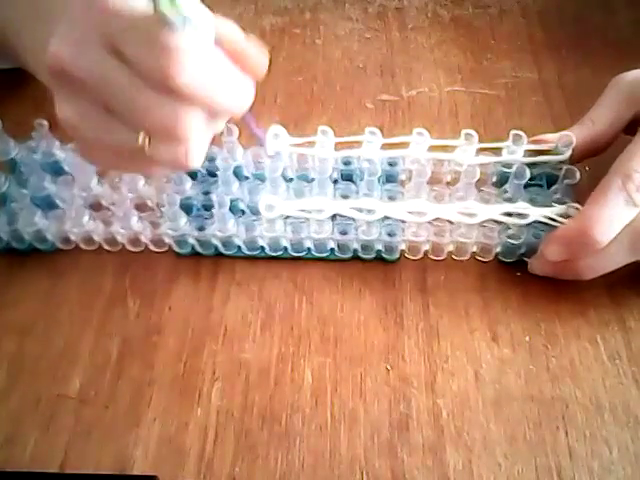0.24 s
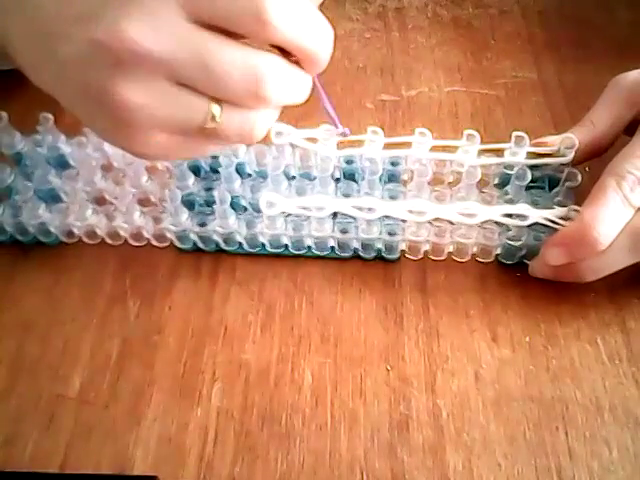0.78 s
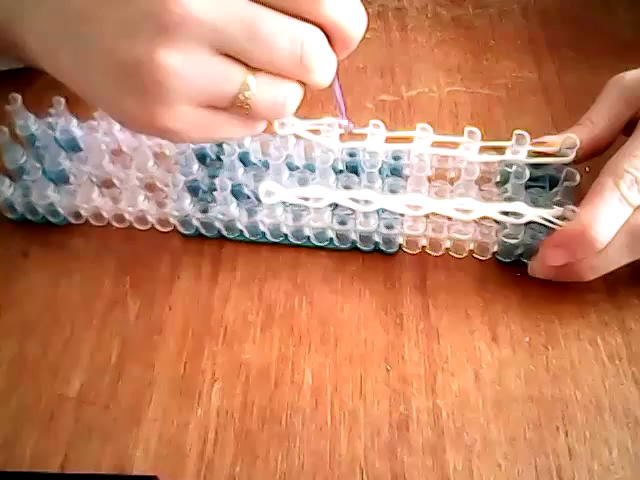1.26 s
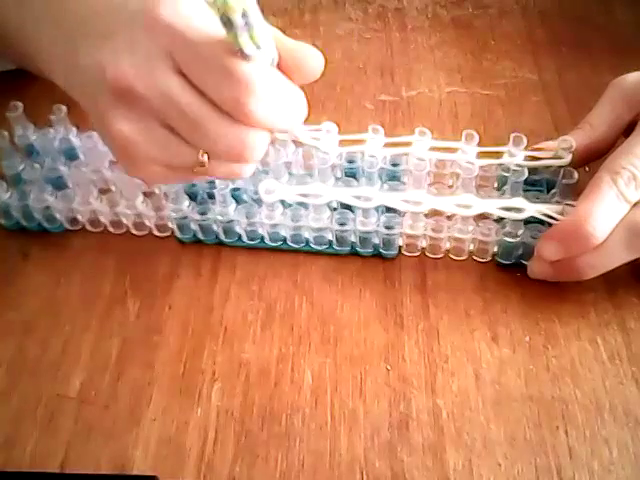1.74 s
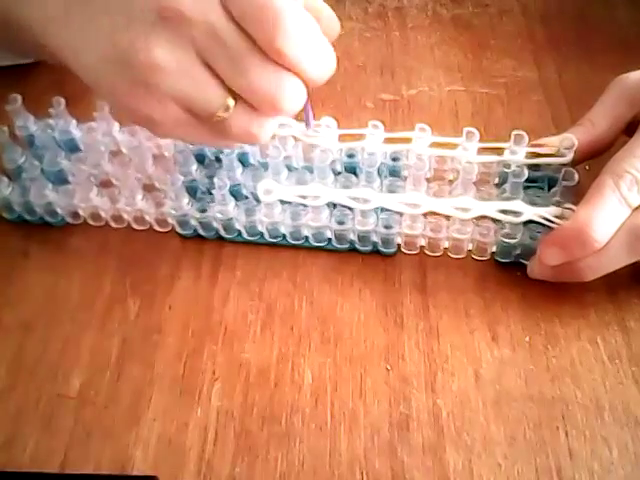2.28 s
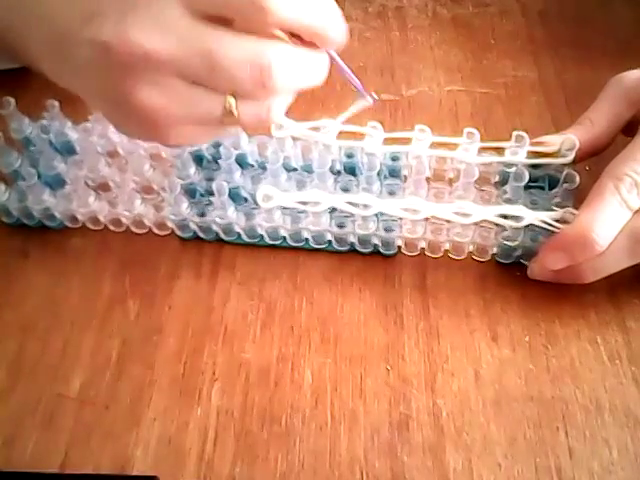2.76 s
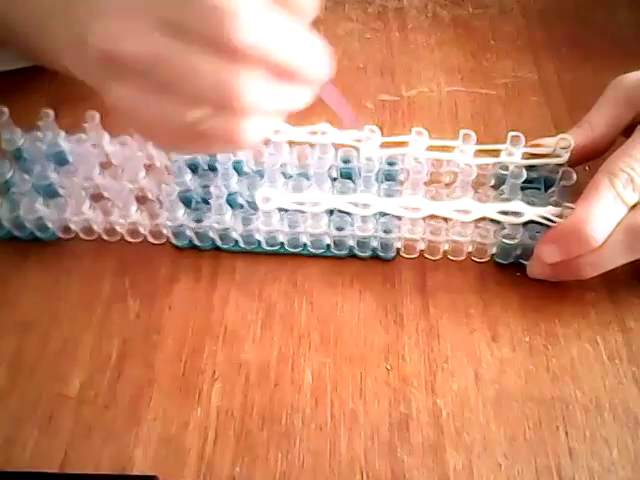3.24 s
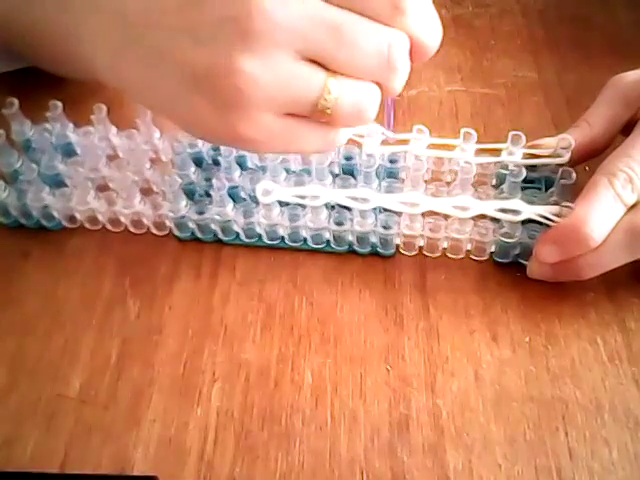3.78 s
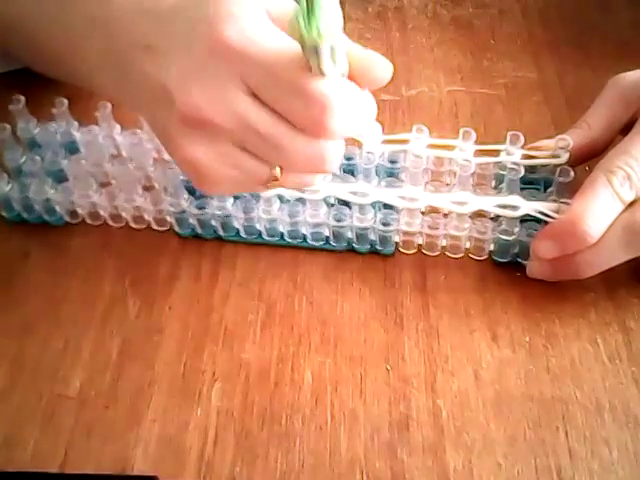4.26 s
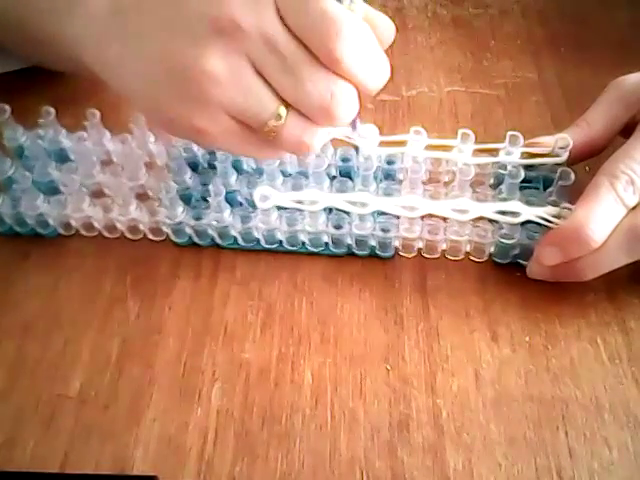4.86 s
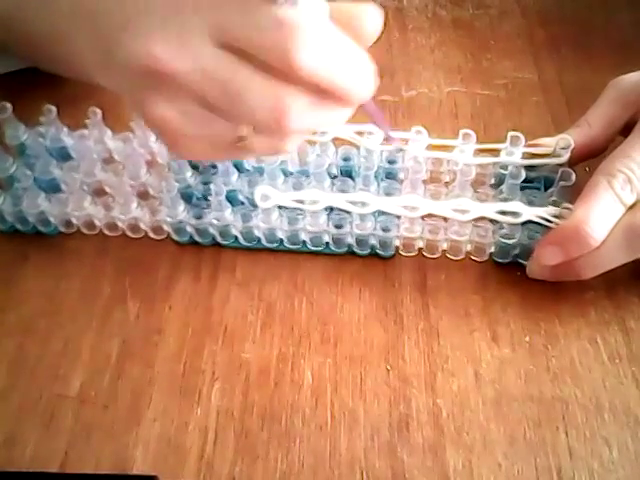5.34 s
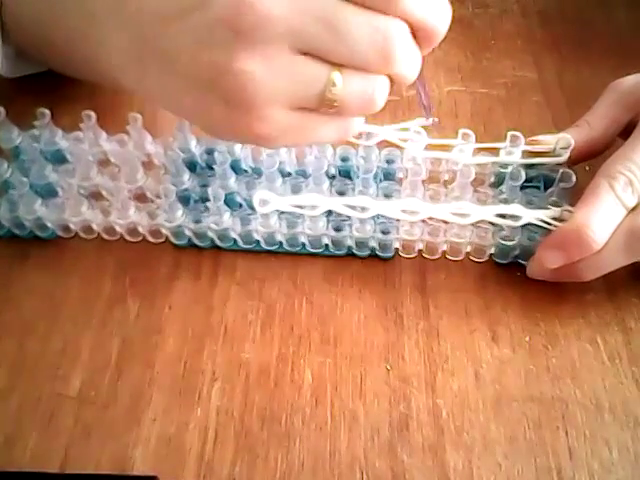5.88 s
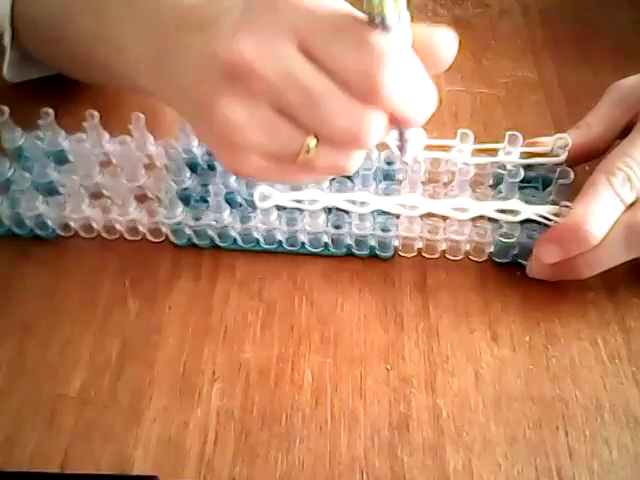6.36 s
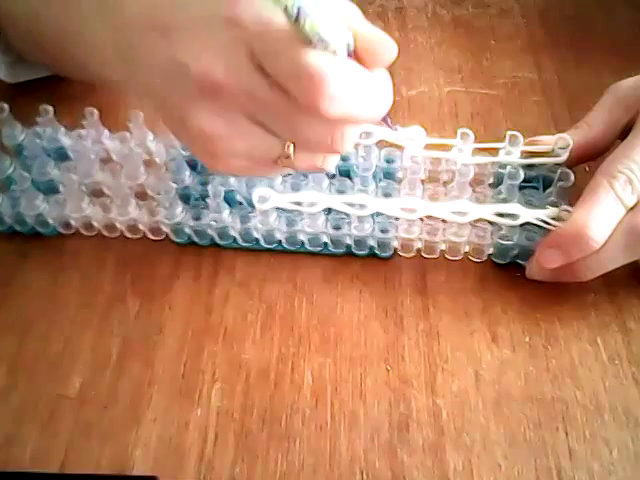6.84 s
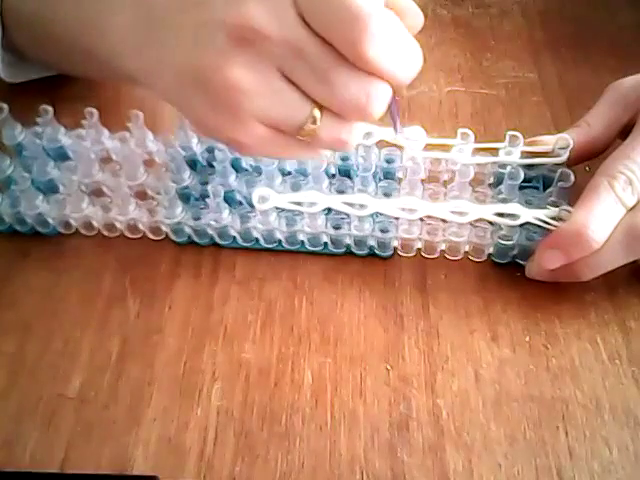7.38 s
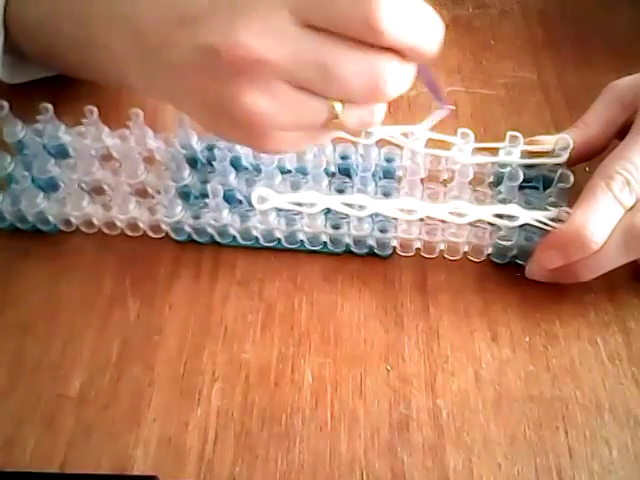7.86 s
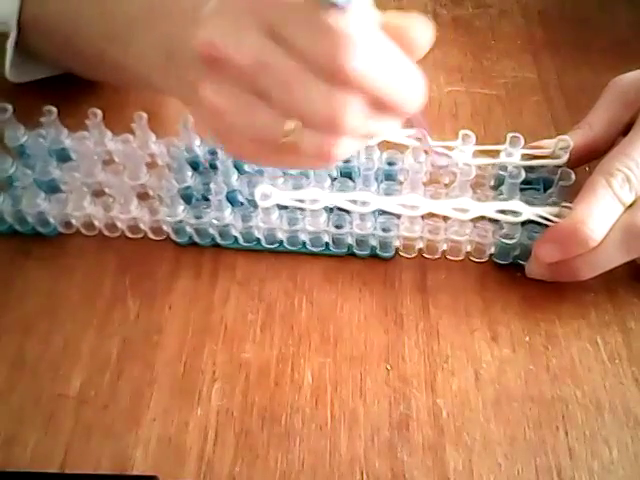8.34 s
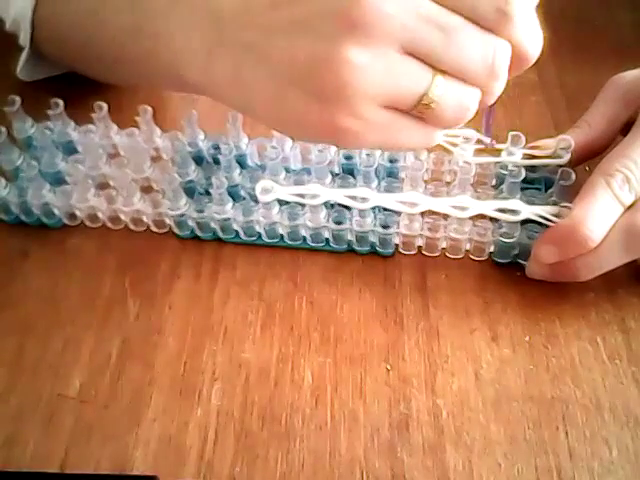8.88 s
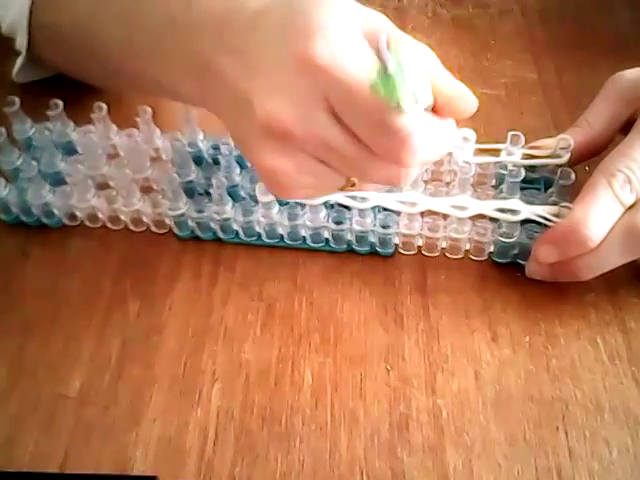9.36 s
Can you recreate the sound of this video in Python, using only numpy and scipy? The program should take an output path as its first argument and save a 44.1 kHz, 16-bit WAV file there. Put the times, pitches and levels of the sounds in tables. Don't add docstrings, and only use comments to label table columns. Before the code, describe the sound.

Light ticks and board bumps start at once, then a dense, louder cluster of clicks, knocks and buzzing near one and a half to two seconds. Sharp snaps return about three, four, five and a half, six and a half, eight and nine and a half seconds, with quieter pauses between. All is dry, small and close, indoors, over soft hum and the unsteady, watery hiss of a basic camera microphone.

```python
import sys
import numpy as np
from scipy import signal
from scipy.fft import rfft, irfft, next_fast_len
from scipy.io import wavfile
from scipy.ndimage import uniform_filter1d, map_coordinates

SR = 44100
rng = np.random.default_rng(int(sys.argv[2]) if len(sys.argv) > 2 else 0)


def wav_out(sig):
    wavfile.write(sys.argv[1], SR, np.round(np.clip(np.atleast_2d(sig).T, -1, 1) * 32767).astype(np.int16))


def ratio_of_db(decibels):
    return 10 ** (np.asarray(decibels, float) / 20)


N = 424241
HZ = np.fft.rfftfreq(8192, 1 / SR)


def unit(x):
    return x / np.sqrt(np.mean(x ** 2) + 1e-20)


def add(out, start_s, x):
    part = out[round(start_s * SR):][:len(x)]
    part += x[:len(part)]


def modes(table, f):
    total = 0
    for k, (centre_hz, width_hz, db) in enumerate(table):
        loss = 1j * f * width_hz
        total = total + (-1) ** k * ratio_of_db(db) * loss / (centre_hz * centre_hz - f * f + loss)
    return total


def soft(f, corner_hz):
    return 1 / (1 + 1j * f / corner_hz) ** 2


def coloured(x, gain):
    m = len(x)
    return unit(irfft(rfft(x) * gain(np.fft.rfftfreq(m, 1 / SR)), m)[:N])


def noise(gain):
    return coloured(rng.standard_normal(next_fast_len(N + 8192)), gain)


def along(points):
    f, db = np.transpose(points)
    return lambda hz: ratio_of_db(np.interp(np.log(hz + .1), np.log(f + 0.079), db, -120, -120))


def wobble(rate_hz):
    knots = rng.standard_normal(int(N * rate_hz / SR) + 4)
    return map_coordinates(knots, [np.arange(N) * rate_hz / SR])


def strokes(rows, edge_s):
    t = np.arange(0, N / SR, .002)
    gain = 0
    for start_s, length_s, db in rows:
        rise = 1 + np.tanh((t - start_s) / edge_s)
        fall = 1 - np.tanh((t - start_s - length_s) / (2 * edge_s))
        gain = gain + ratio_of_db(db) * rise * fall / 4
    return np.interp(np.arange(N) / SR, t, gain)


def clicks():
    # (time [s], peak [dB], frame [dB], mid modes [dB], hardness [dB])
    low_row = [(.4883, -38.5, -8.5, -8, -12), (.615, -27.5, 6, -5, -10.5), (1.1471, -30, 4, -7, -11.5),
               (1.5302, -41, -.5, -8, -16.5), (3.038, -25, -3, 1, -6.5), (4.338, -30.5, 9, -7, -10.5),
               (5.474, -33, 2.5, -4, -12), (5.4984, -26, 3.5, 0, -4.5), (6.6593, -30, 4.5, -8, -12),
               (8.1543, -33, 3.5, -4, -10), (8.1793, -25, 2.5, -4, -7), (9.4285, -34.5, 7, -3, -4.5)]
    high_row = [(.3112, -38, 6, -6, -9), (1.5455, -38, 3, -4, -6), (1.5533, -22, -7.5, -5, -6.5),
                (1.564, -33, 0, -6, -4), (1.5696, -36, 3, -3, -2), (1.5995, -40, 5, -3, -3),
                (1.6399, -37, 7, 8, 6), (1.6554, -40, 12.5, 3, 5), (1.8776, -26, 2.5, -7, -13),
                (2.3886, -28, 5, -18, -25.5), (2.606, -34.5, -26, -12, -17.5),
                (2.9976, -23.5, -3.5, -3, -9), (3.324, -34.5, 0, -8, -12), (4.0472, -26, -2, -3, -7.5)]
    end_pins = [
        (4.1605, -30, 5, -4, 2),
        (9.053, -42.5, 10, -7, -11),
        (7.1604, -47.5, 0, 0, -8),
    ]
    # (time [s], peak [dB], frame [dB], hardness [dB])
    ticks = [(.1471, -52, 19.5, -5), (0.2783, -42, -0.5, 3), (.39, -45.5, 13, -10.5),
             (.6994, -52.5, 27.5, -12.5), (0.828, -50, -6.43, -6.5), (2.5142, -43.5, 6, -8),
             (2.5416, -51, 4.5, -5.5), (3.2668, -55, -8, 9.5), (4.8738, -44, -0.5, -14.5),
             (4.8998, -44.5, 10, -20.5), (5.6523, -49, 6.5, -2.5), (5.683, -40, -2, -8.5),
             (6.2941, -44.5, 10, -11.5), (6.4078, -36.5, -1.5, -2.5), (6.4234, -39, 6.5, -5.5),
             (6.6464, -41, -7.5, -19), (7.3083, -48, -6, -3), (7.7007, -47.5, -9, -11.5),
             (7.8865, -62.5, 22, 3), (9.1182, -49.5, 13.5, -13.5), (9.184, -41, -15, 2)]
    # (centre [Hz], width [Hz], level [dB])
    low_pins = [(1600, 250, -17), (1866, 55, -7), (2090, 70, 0), (2320, 45, -7), (2600, 300, -19),
                (2950, 130, -15), (3250, 250, -22)]
    high_pins = [(1600, 250, -19), (1866, 50, -6), (2120, 120, -13), (2320, 26, 3), (2520, 200, -16),
                 (2370, 130, -1), (2950, 200, -19)]
    rim_pins = [(1600, 250, -13), (1880, 80, 0), (2060, 110, -4), (2320, 100, -8), (2900, 400, -18)]
    # (centre [Hz], width [Hz], level [dB])
    frame = [(589.3, 72, -8), (657.6, 24.4, -1), (822, 49.7, -4), (1107, 32, -3.5), (1366, 47.7, -6)]
    mids = [(3580, 110, -6), (3750, 90, -6), (4120, 65, 1), (4380, 150, -13), (4750, 250, -12)]
    tip = [(5350, 300, 7), (5950, 350, 15), (6500, 400, 15), (7348, 600, 20), (8000, 600, 16),
           (9500, 1500, 9), (11020, 2000, 2)]
    touch_db, room_grit_db = 1.2, 3
    blow, build_s = 15, .0012
    room_blur, room_lag_s = 4, .009

    out, t = np.zeros(N), np.arange(8192) / SR
    chatter = (1 - np.exp(-(t / .0012) ** 2)) * np.exp(-(t / .005) ** 2)
    walls = 1 / (1 + (HZ / 10500) ** 10)
    ending = 1 - (t / t[-1]) ** 4
    build = 1 - np.exp(-(t / build_s) ** 2)
    late = 1 - np.exp(-(t / room_lag_s) ** 2)
    light = [(s, db, frame_db, .84 * hard_db + 1, hard_db) for s, db, frame_db, hard_db in ticks]
    groups = [(low_pins, low_row + light), (high_pins, high_row), (rim_pins, end_pins)]
    events = [(pins, *row) for pins, rows in groups for row in rows]
    for pins, start_s, db, frame_db, mids_db, hard_db in events:
        force, echoes, grit = rng.standard_normal((3, len(t)))
        contacts = force * np.abs(force) * chatter
        contacts[SR // 2000] += blow
        contacts = rfft(contacts)
        echoes = echoes * ending * ratio_of_db(room_grit_db * unit(uniform_filter1d(grit, size=90)))
        # (modes, level [dB], contact corner [Hz], room [dB], room t60 [s])
        parts = [(pins, .5, 5000, -26, .34), (frame, frame_db - 7, 1500, -25, .25),
                 (mids, mids_db - .5, 7000, -26, .32), (tip, hard_db + 5, 14000, -24, .34)]
        for table, level_db, corner_hz, room_db, t60_s in parts:
            table = np.add(table, [0, 0, touch_db] * rng.standard_normal((len(table), 1)))
            body, contact = modes(table, HZ), soft(HZ, corner_hz)
            ring = irfft(contacts * body * contact) * build
            blurred = body + .7 * modes(table * [1, room_blur, 1], HZ)
            tail = echoes * ratio_of_db(-60 * t / t60_s) * late
            room = irfft(rfft(tail) * walls * contact * blurred)
            room = ratio_of_db(room_db) * room / np.sqrt(np.mean(room[:SR // 20] ** 2))
            add(out, start_s - .001, ratio_of_db(db + level_db) * (ring / np.abs(ring).max() + room))
    return out


def cracks():
    # (time [s], peak [dB])
    edges = [(0.2758, -53), (1.5519, -48), (1.6387, -43), (1.6544, -53), (1.8761, -53), (2.3845, -58),
             (2.9966, -53), (3.037, -45), (4.0462, -49), (4.1599, -33), (4.336, -55), (5.4725, -49),
             (5.4964, -43), (6.4033, -55), (6.6583, -55), (8.1778, -41), (9.1834, -56), (9.425, -56)]
    size, t = np.zeros(N), np.arange(SR // 5) / SR
    decay = ratio_of_db(-60 * t / .02) + ratio_of_db(-22 - 60 * t / .2)
    burst = (1 - np.exp(-t / .0006)) * decay
    for start_s, db in edges:
        add(size, start_s, ratio_of_db(db - 4) * burst)
    return size * noise(along([(9500, -20), (11500, 0), (15000, -3), (16800, -12)]))


def thuds():
    # (time [s], peak [dB], pitch [Hz], t60 [s])
    knocks = [(.194, -31, 202, .18), (.231, -50.5, 236, .06), (.328, -36, 650, .04),
              (.335, -31, 360.6, 0.051), (.491, -37.5, 322, .07), (.7, -28, 324.4, 0.075),
              (.981, -45.5, 253, 0.057), (1.018, -33.5, 419.8, .11), (1.541, -32.5, 319.7, 0.06),
              (1.64, -26.5, 351, 0.037), (1.659, -30.5, 414.4, 0.126), (1.845, -32, 328, 0.044),
              (1.877, -22.5, 315, 0.04), (2.386, -33.5, 234, 0.094), (3.386, -41, 302, 0.065),
              (3.428, -30.5, 341, 0.0227), (5.449, -35.5, 333, 0.0315), (5.81, -33.5, 382, 0.0376),
              (7.881, -36, 213.2, 0.163), (9.119, -37.5, 223, 0.023), (9.184, -38.5, 288, 0.042),
              (9.233, -45, 220, 0.045)]
    # (time [s], peak [dB], pitch [Hz], table thump [dB])
    landings = [(.151, -32, 439, -4), (.305, -45.5, 296, -7), (.348, -42, 291, -4), (.388, -34, 219, -3),
                (.61, -28, 229.7, -7), (0.637, -33, 441, 0), (1.049, -41, 450, -13), (1.144, -38, 263, -15),
                (1.597, -36, 295, -1.5), (1.699, -37, 407, -15.5), (1.905, -31, 240, -4),
                (4.337, -33, 329.3, -1.1), (4.808, -40.5, 235, -12.5), (4.869, -48, 221, -7.5),
                (6.407, -33.5, 311, -7), (6.429, -35.5, 271, -6.5), (6.658, -25.5, 314.7, -10.5),
                (6.688, -33, 225, -1.5), (6.718, -49.5, 223, -3.5), (9.425, -32.5, 447, -6)]
    edge_thump_db, landing_t60_s = -21, 0.0468
    out, t = np.zeros(N), np.arange(8192) / SR
    events = [(s, db, hz, edge_thump_db, t60_s) for s, db, hz, t60_s in knocks]
    events += [(*row, landing_t60_s) for row in landings]
    thump = (1 - np.exp(-t / 0.00228)) * np.sin(2 * np.pi * 46 * t)
    for start_s, db, hz, table_db, t60_s in events:
        force = 0.221 * rng.standard_normal(len(t)) * ratio_of_db(-60 * t / 0.0462)
        force[0] = 1
        width_hz = 2.19 / max(t60_s, .01)
        board = modes([(hz, width_hz, 0), (150, 90, -20), (1.777 * hz, 120, -12)], HZ)
        knock = irfft(rfft(force) * board * soft(HZ, 812))
        table = ratio_of_db(table_db - 60 * t / 0.177) * thump
        add(out, start_s - .0015, ratio_of_db(db) * (knock / np.abs(knock).max() + 1.62 * table))
    return out


def twangs():
    # (time [s], peak [dB], pitch [Hz], t60 [s], free for [s])
    plucks = [
        (4.038, -41.5, 359, 0.179, .12),
        (4.166, -33, 337.4, 0.249, .25),
        (6.299, -44, 360, 0.297, 0.0675),
    ]
    out, t = np.zeros(N), np.arange(SR // 3) / SR
    for start_s, db, hz, t60_s, free_s in plucks:
        phase = 2 * np.pi * hz * (t + 0.081 * 0.0081 * np.exp(-t / 0.0052))
        caught_db = -60 * np.maximum(t - free_s, 0) / .03
        size = ratio_of_db(db - 60 * t / t60_s + caught_db) * (1 - np.exp(-t / .002))
        add(out, start_s - .004, 3.16 * size * (np.sin(phase) + 0.034 * np.sin(2 * phase)))
    return out


def buzz():
    # (start [s], swell [s], peak [dB], peak pitch [Hz], fade per 30 dB [s])
    releases = [(.615, 0.0326, -40.5, 799.5, .5), (1.875, 0.0337, -27.5, 822, 0.04),
                (1.915, 0.0324, -26, 865, 0.1781), (3.0, .04, -35.5, 795, 0.0845),
                (3.04, 0.0607, -33, 840, 0.11), (3.32, 0.0636, -46, 791, 0.02), (4.05, .02, -46, 860, .1),
                (4.34, 0.071, -41, 880, .08), (5.5, .058, -39.5, 880, .15), (6.665, 0.0577, -42, 830, 0.17),
                (8.185, 0.064, -38.5, 823.4, 0.08), (9.425, 0.0655, -36, 828, 0.2)]
    swell_gain_db, tighten, slacken = 5, 0.062, 0.02414
    damp_db, damp_s = 8.5, .008
    out, t = np.zeros(N), np.arange(SR // 3) / SR
    unsteady_db = 2 + 1.5 * wobble(70)
    rattle_modes = [(718, 114.3, -1), (880, 83.2, 1.0), (1160, 95.5, -7.5), (2200, 650, -32)]
    rattle = noise(lambda f: modes(rattle_modes, f))
    waver = 1 + 0.017 * wobble(45)
    for start_s, swell_s, db, hz, fade_s in releases:
        i = np.minimum(round(start_s * SR) + np.arange(len(t)), N - 1)
        before = np.clip(1 - t / swell_s, 0, 1)
        after_s = np.clip(t - swell_s, 0, 1)
        pitch_hz = hz * (1 - tighten * before - slacken * np.tanh(after_s / damp_s))
        phase = 2 * np.pi * np.cumsum(pitch_hz * waver[i]) / SR
        tone = np.sin(phase) + 0.265 * np.sin(.91 * phase) + 0.42 * rattle[i]
        loss_db = damp_db * np.tanh((after_s / damp_s) ** 2) + 30 * after_s / fade_s
        size = ratio_of_db(db - swell_gain_db * before - loss_db + unsteady_db[i])
        add(out, start_s, size * (1 - np.exp(-t / 0.0022)) * tone)
    return out


def rubbing():
    # (time [s], level [dB])
    effort = [(.05, -67), (.4, -48.5), (.55, -54), (.68, -43.5), (.95, -53), (1.4, -58), (1.56, -46),
              (1.8, -56), (2.4, -58.5), (2.95, -51), (3.7, -59.5), (4.2, -53.5), (5.1, -58.5), (6.7, -54),
              (7.6, -62), (7.97, -55.5), (8.89, -56), (9.4, -54.5)]
    # (start [s], length [s], level [dB])
    rustles = [(.285, 0.09, -54.5), (.61, 0.085, -58.5), (1.1, 0.153, -65), (1.54, 0.168, -54),
               (2.5, 0.187, -59.5), (3.1, .22, -65), (4.05, .3, -65), (5.5, 0.243, -62.5),
               (6.65, 0.178, -59.5), (7.85, 0.147, -67), (4.82, .12, -63.5), (5.06, .05, -62),
               (7.14, 0.158, -70), (9.05, .17, -62.5), (9.42, .15, -63)]
    # (centre [Hz], width [Hz], level [dB])
    stretch = [(1866, 50, -5), (2090, 300, -11), (2320, 50, -4), (2915, 120, -13), (3700, 220, -9.5),
               (4114, 90, -7), (4425, 300, -14.5), (6190, 1500, -14.5), (7620, 1200, -14)]
    # (start [s], length [s], level [dB])
    scrapes = [(.145, 0.11, -41), (.32, 0.1186, -42.5), (.615, 0.07, -41), (.7, .04, -44),
               (.98, 0.085, -40.5), (1.54, 0.074, -41.5), (1.635, 0.0427, -40), (4.81, 0.13, -49),
               (5.07, 0.029, -49), (7.87, 0.053, -51), (9.05, .2, -52)]
    board_modes = [(262.2, 62.3, 0.0), (332.1, 45.3, 0), (426.3, 55.7, -5), (840, 131, -5)]

    def board(f):
        return modes(board_modes, f) * soft(f, 1360)

    time_s, effort_db = np.transpose(effort)
    flicker_db = 2.5 * wobble(20)
    low_db = np.interp(np.arange(N) / SR, time_s, effort_db) - 3.0 + flicker_db[::-1]
    low = ratio_of_db(low_db) * noise(board)
    drag = ratio_of_db(-69.5) + strokes(rustles, edge_s=.04)
    grit = ratio_of_db(flicker_db + 2.5 * wobble(140))
    high = drag * grit * noise(lambda f: modes(stretch, f))
    slips = np.zeros(next_fast_len(N))
    slips[:N] = (rng.random(N) < 600 / SR) * rng.laplace(size=N)
    return low + high + strokes(scrapes, edge_s=.015) * coloured(slips, board)


def room_hum():
    # (frequency [Hz], level per Hz [dB])
    spectrum = [(29, -37), (50, 2), (102, -0.5), (125, -5), (162, 3.5), (219, -16.5), (250, -7),
                (277, -15.5), (453, -13), (502, -21.5), (821, -5.5), (949, -20), (1150, -11), (1600, -29.5),
                (2080, -52), (3520, -120)]
    return ratio_of_db(-51.5 + 1.34 * wobble(6.6)) * noise(along(spectrum))


def fan_drone():
    # (centre [Hz], width [Hz], level [dB])
    resonances = [(195.98, 6.94, 4.5), (259.4, 4.7, -8.5), (718.8, 50.5, -4), (795, 10.8, 1),
                  (861.2, 6.33, 8), (1141.8, 21.5, -4.5)]
    return ratio_of_db(-58.0 + 0.79 * wobble(3.7)) * noise(lambda f: modes(resonances, f) * soft(f, 947))


def scene():
    loom = clicks() + cracks() + thuds()
    bands = twangs() + buzz()
    return (loom + bands + rubbing() + room_hum() + fan_drone())[None]


def camera_whines():
    # (frequency [Hz], level [dB], pulsing depth [1])
    tones = [(5512.5, -74, .5), (8000, -68, .65), (8268.75, -66, .65), (10000, -72, .35), (11025, -76, .65)]
    frame_s, frame_peak_s = .06, .045
    t = np.arange(N) / SR
    pulse = np.tanh(2 * np.cos(2 * np.pi * (t - frame_peak_s) / frame_s) + .4)
    out = np.zeros(N)
    for hz, db, depth in tones:
        out += ratio_of_db(db + 3.5 + wobble(7)) * (1 + depth * pulse) * np.sin(2 * np.pi * hz * t)
    return out


def camera_hiss():
    # (frequency [Hz], level per Hz [dB])
    spectrum = [(940, -54), (1600, -3), (2240, -11.5), (3010, -2.5), (3360, -36), (4010, -9), (4700, -24.5),
                (5350, -3.5), (5900, -12), (8180, 2), (8850, -7), (11100, -7), (14100, -45), (17000, -50)]
    hiss = ratio_of_db(-58.5 + .8 * wobble(8)) * noise(along(spectrum))
    top = noise(along([(11500, 0), (14000, -5), (17300, -11)]))
    return hiss + ratio_of_db(-72.5 + 2 * wobble(9)) * top


def camera_drift():
    # (frequency [Hz], level per Hz [dB])
    spectrum = [(.7, -24), (2.7, -8), (4.7, 0), (8.7, -1), (13, -5), (17, -12), (25, -19), (40, -22),
                (60, -40)]
    return ratio_of_db(-37) * noise(along(spectrum))


def thin_bands(x, unsteady_db, follow, line_db):
    # (frequency [Hz], level [dB])
    threshold = [(20, -30), (1300, -13), (1900, -5), (2900, -6), (3400, -1.5), (4600, -1), (5600, -5),
                 (6500, -6), (7300, -10), (11000, -10), (12000, 4.5), (22050, 5)]
    hz, _, z = signal.stft(x, SR, "cosine", nperseg=2048)
    starts = np.r_[0:256:16, 256:1025:32]
    band = np.searchsorted(starts, np.arange(len(hz)), "right") - 1
    power = np.add.reduceat(np.abs(z) ** 2, starts)
    level = np.sqrt(power / np.bincount(band)[:, None])
    usual = np.median(level, axis=1)[:, None]
    masking = (uniform_filter1d(level / usual, size=9, axis=0) + 1e-9) ** np.clip(follow, 0, 1)
    loudness = np.linalg.norm(level, axis=0)
    masking = masking * np.maximum(loudness / np.median(loudness), 1) ** .2
    wander = unit(uniform_filter1d(rng.standard_normal(level.shape), size=2, axis=1))
    step = usual * masking * along(threshold)(hz[starts])[:, None] * ratio_of_db(unsteady_db * wander)
    over = np.abs(z) / step[band]
    strong = over > ratio_of_db(12)
    kept = (level > step)[band] & (over > ratio_of_db(line_db)) | strong
    return signal.istft(z * kept, SR, "cosine", nperseg=2048)[1][:N]


def roll_off(x):
    return signal.sosfilt(signal.butter(12, 17310, fs=SR, output="sos"), x)


def record(dry):
    heard = dry[0] + camera_whines() + camera_hiss()
    gated = thin_bands(heard, unsteady_db=4.6, follow=.3, line_db=-4)
    offset = -.0738
    return roll_off((gated + camera_drift() + offset)[None])


dry = scene()
out = record(dry)
wav_out(out)
```